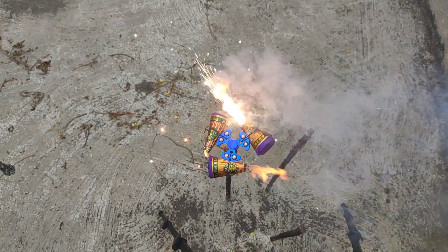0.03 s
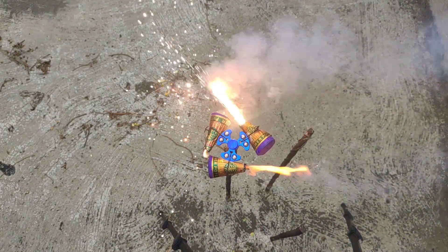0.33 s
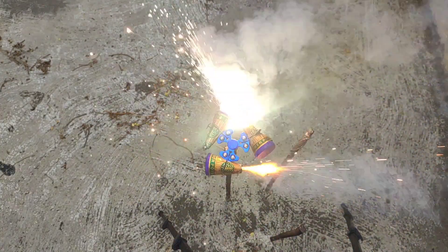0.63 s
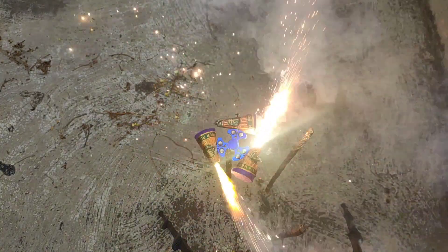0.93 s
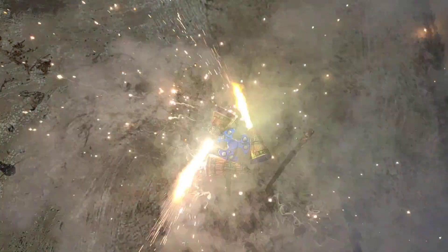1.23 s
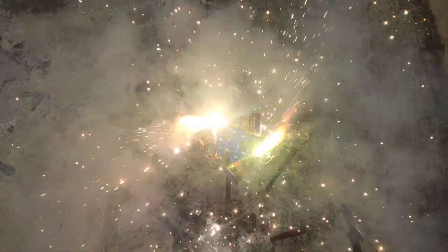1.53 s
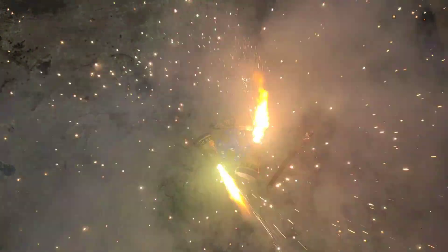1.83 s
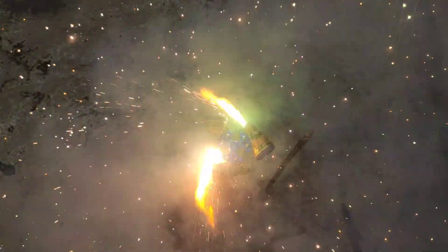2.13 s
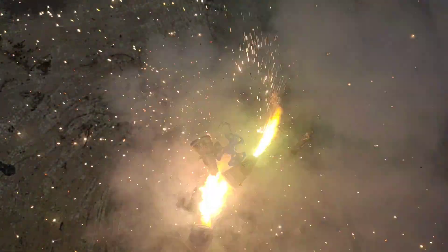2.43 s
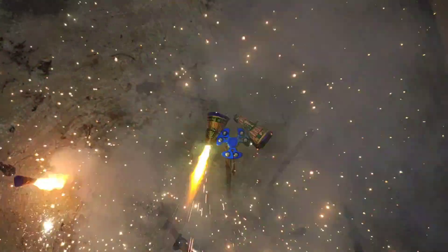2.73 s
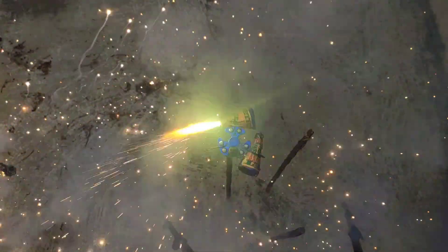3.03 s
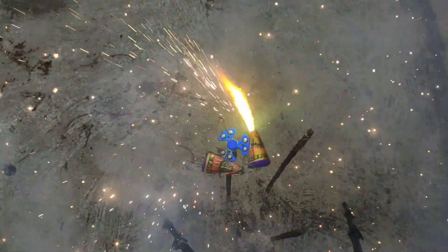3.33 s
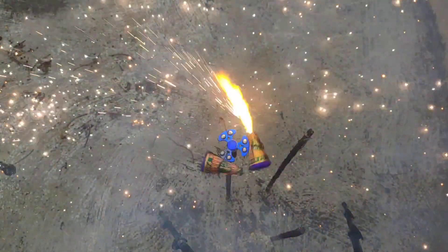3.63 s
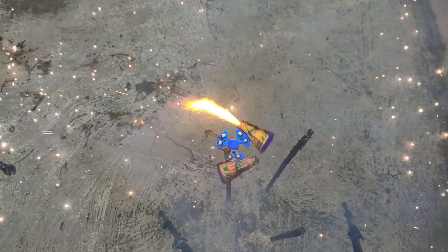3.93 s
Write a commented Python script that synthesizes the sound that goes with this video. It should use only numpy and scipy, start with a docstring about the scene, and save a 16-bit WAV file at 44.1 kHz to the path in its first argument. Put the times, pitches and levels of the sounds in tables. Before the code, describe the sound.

A spinning firework fizzes softly with a few small snaps, then catches and builds into a loud, crackling roar and hiss. It swirls between left and right close by outdoors, while air rumbles on the microphone.

```python
"""Firework wheel on concrete

Small cones on a spinner fizz and snap, then catch and drive it round. Two jets of turbulent gas roar
and spit sparks, the second taking over from the first, and their hiss swirls from ear to ear as they
circle under the microphones. Hard surfaces close by answer, air buffets the mics, and peaks overload."""
import sys
import numpy as np
from scipy import signal
from scipy.fft import rfft, irfft, next_fast_len
from scipy.io import wavfile
from scipy.ndimage import map_coordinates

SR = 44100
rng = np.random.default_rng(int(sys.argv[2]) if len(sys.argv) > 2 else 0)


def waveform_to_disk(signal):
    """Save audio, clipped to [-1, 1], as 16-bit WAV at the path in sys.argv[1]."""
    frames = np.transpose(np.atleast_2d(signal))
    scaled = np.clip(frames, -1, 1) * 32767
    samples = np.round(scaled).astype(np.int16)
    wavfile.write(sys.argv[1], SR, samples)


N = 176400

# the wheel rests, then spins up (time [s], angle [turns])
WHEEL_ANGLE = [(0, -.5), (.85, -.5), (1.02, -.27), (1.178, 0), (1.4, .5), (1.525, 1), (1.708, 2),
               (1.837, 3), (2.038, 5), (2.203, 7), (2.478, 11), (2.647, 13.3), (2.83, 15.3), (3.209, 19.3),
               (3.592, 23.3), (4, 27.22)]
# the first cone burns down and the second takes over (time [s], second cone's share of the power [0-1])
SECOND_CONE_SHARE = [(.9, .02), (1.8, 0.25), (2.3, 0.52), (2.5, 0.62), (2.7, 0.92), (2.95, 0.86)]
# the second cone's thinner voice (frequency [Hz], gain against the first [dB])
SECOND_CONE_EQ = [(200, -2.5), (350, 0), (600, -0.5), (1100, 0.3), (1900, 0), (2900, 2), (4500, 0),
                  (8000, -1), (15000, 1.5)]
# how far a circling jet swings the delay between the mics (time [s], swing either way [ms])
DELAY_SWING = [(0, .018), (.85, .028), (1.18, .055), (2.3, .056), (2.85, .05), (3.1, .04), (4, .035)]
# envelopes of a jet's low roar, mid rush and high hiss (time [s], relative level [dB])
ROAR_ENVELOPE = [(.62, -40), (.71, -30.5), (.95, -31), (1.2, -27.5), (1.45, -22.7), (1.62, -23.3),
                 (1.85, -21.7), (2.15, -22), (2.45, -22.7), (2.73, -21.5), (2.82, -24.5), (2.89, -23),
                 (2.96, -25), (3.65, -24.3), (3.9, -25), (4, -28)]
RUSH_ENVELOPE = [(0.62, -47), (0.72, -30.5), (0.94, -27.5), (0.95, -30.5), (1.15, -22.5), (1.17, -25),
                 (1.47, -16.5), (2.19, -13.5), (2.43, -16.5), (2.5, -17.5), (2.52, -15), (3.1, -14),
                 (3.17, -16.5), (3.22, -14.5), (3.98, -15.5), (4.0, -20)]
HISS_ENVELOPE = [(0.62, -58), (0.72, -32), (0.94, -25), (0.95, -38), (1.0, -26.5), (1.35, -18),
                 (1.42, -14.5), (1.65, -15), (1.74, -15), (1.78, -12.5), (1.84, -13), (1.91, -9),
                 (1.96, -13), (2.06, -9), (3.67, -9), (3.71, -9.5), (3.75, -9), (3.8, -9.5), (3.86, -10.5),
                 (3.9, -12.5), (3.97, -12.5), (4.0, -11.5)]
# tone of the same three layers (frequency [Hz], relative level [dB])
ROAR_TONE = [(60, -32), (130, -9), (220, -2.5), (300, -4), (420, -2.5), (600, -1), (820, -1), (1100, -6.5),
             (2000, -39)]
RUSH_TONE = [(400, -20.5), (780, -9.5), (1000, -1.5), (1400, -0.5), (1750, 0), (2000, 1), (2600, -1),
             (3300, -3), (4200, -8.5), (8000, -17)]
HISS_TONE = [(1500, -26), (2900, -9), (3900, -3), (5200, -0.5), (7000, 0.5), (9000, -1), (11000, -3),
             (13000, -7), (15500, -9.5)]
# a moving high shelf on the hiss (time [s], gain [dB])
HISS_SHELF = [(.68, -9), (.73, 2), (.78, -18), (1.06, -16), (1.12, -3.5), (1.2, -2), (1.3, -4),
              (1.42, -5.5), (1.52, 2), (1.7, 0), (2.2, -3), (3.2, 1.5), (4, -0.2)]

# envelope of the soft flames (time [s], relative level [dB])
FIZZ_ENVELOPE = [(0, -40.5), (.1, -41.5), (.2, -44.5), (.24, -38.5), (.3, -38.5), (.35, -34.5), (.42, -40),
                 (.5, -36.5), (.54, -40.5), (.575, -35), (.62, -36.5), (.66, -35)]
# grains of powder snapping in the flames (time [s], level [dB])
POWDER_SNAPS = [(0.154, -36), (0.2723, -33), (0.36, -21), (.5487, -29)]
# tone of the fizz and of the snaps (frequency [Hz], relative level [dB])
FIZZ_TONE = [(60, 11), (200, -4), (550, -1.5), (1100, -7), (2000, -11.5), (3500, -17), (6500, -13.5),
             (10000, -17), (15500, -24)]
SNAP_TONE = [(100, -3), (500, -3), (2000, -8), (8000, -12), (15500, -12)]

# envelope of the air rumbling on the mics (time [s], relative level [dB])
RUMBLE_ENVELOPE = [(0, -23), (.22, -29.5), (.3, -29.5), (.5, -33), (.62, -43), (.85, -33), (1.05, -30.5),
                   (1.45, -29.5), (1.75, -34), (2, -31.5), (2.4, -30), (2.8, -29.5), (3, -42), (3.5, -39),
                   (4, -46)]
# low thumps as smoke blows past (time [s], relative level [dB])
SMOKE_THUMPS = [(.15, -24), (1.27, -26), (1.44, -23), (1.53, -25), (1.67, -26), (1.88, -18), (2.895, -18)]
# tone of the rumble and of the thumps (frequency [Hz], relative level [dB])
RUMBLE_TONE = [(10, -8.5), (25, -0.5), (42, -2.5), (70, -6), (110, -13), (170, -23), (400, -37),
               (1000, -80)]
THUMP_TONE = [(15, 4), (45, 2), (110, -9), (250, -14.5), (500, -33), (1500, -60)]
# the air hits the right mic harder (time [s], left minus right [dB])
AIR_BALANCE = [(0, -7), (.6, -5.5), (1.2, -5), (1.9, -3), (2.6, -6), (4, -5)]

# direct against scattered sound (frequency [Hz], direct share of the power [0-1])
DIRECT_SHARE = [(100, 0.97), (500, 0.93), (1100, 0.82), (2300, 0.97), (3700, 0.73), (5000, 0.73),
                (8000, 0.58), (11000, 0.7), (15000, 0.23)]
# reflections off hard surfaces close by (delay [ms], low-frequency gain [ratio])
EARLY_ECHOES = [(3.56, 0.26), (5.17, 0.14), (8.6, 0.024)]
# each mic has its own colour (frequency [Hz], left minus right [dB])
MIC_BALANCE = [(200, 0.8), (1000, 0.2), (2500, 1.1), (3400, 1.8), (4100, 1), (5500, 0), (7100, 2),
               (8300, 2), (9400, 1), (11000, 0.5), (12500, -1.9), (15000, -1.2)]

ROAR_TRIM_DB, RUSH_TRIM_DB, HISS_TRIM_DB, FIZZ_TRIM_DB, RUMBLE_TRIM_DB = 0.16, 1, 3.5, 3, 3


def wheel(ignite_s=0.642, fade_in_s=0.05, trail_turns=0.29):
    """Two jets catch and circle, one trailing the other, in an equal-power crossfade."""
    turns, share = curve(WHEEL_ANGLE), curve(SECOND_CONE_SHARE)
    lit = np.clip((seconds() - ignite_s) / fade_in_s, 0, 1)
    first = jet(turns)
    second = filtered(jet(turns - trail_turns), lambda hz: amp(along(SECOND_CONE_EQ, hz)))
    return lit * (np.sqrt(1 - share) * first + np.sqrt(share) * second)


def jet(turns, flutter_db=0.5, sputter_db=1.3, centre_lag_ms=0.03):
    """One cone burns unsteadily: roar, rush and hiss, swept across the stereo image as it circles."""
    roar = amp(curve(ROAR_ENVELOPE) + ROAR_TRIM_DB + 0.88 * wobble(29.94)) * coloured(gas(), ROAR_TONE)
    rush = amp(curve(RUSH_ENVELOPE) + RUSH_TRIM_DB) * coloured(gas(), RUSH_TONE)
    hiss = nozzle_hiss(turns)
    burn = amp(flutter_db * wobble(18) + sputter_db * wobble(130))
    lag_ms = centre_lag_ms + curve(DELAY_SWING) * np.cos(2 * np.pi * turns)
    return at_mics(burn * (roar + rush + hiss), lag_ms)


def nozzle_hiss(turns, shelf_hz=6800, beam_db=0.5, beam_top_db=1.5, aim_turns=0.22):
    """Hiss beams along the nozzle, so it is louder and brighter each time it faces the mics."""
    facing = np.cos(2 * np.pi * (turns + aim_turns))
    hiss = coloured(gas(), HISS_TONE)
    top = filtered(hiss, lambda hz: 1 - 1 / (1 + (hz / shelf_hz) ** 4))
    top_gain = amp(curve(HISS_SHELF) + beam_top_db * facing)
    level_db = curve(HISS_ENVELOPE) + HISS_TRIM_DB + beam_db * facing + 0.5 * wobble(21.8)
    return (hiss + (top_gain - 1) * top) * amp(level_db - choke())


def choke(start_s=0.88, depth_db=4, recovery_s=0.025):
    """The jet chokes for a moment: a sudden dip in the hiss, in dB, that quickly recovers."""
    age = seconds() - start_s
    return depth_db * (age >= 0) * np.exp(-np.abs(age) / recovery_s)


def gas(sparks_per_s=2500, spread_db=2.5, crackle_db=-4.5):
    """Turbulence with sparks crackling in it; rows: direct, scattered left, scattered right."""
    shape = (3, N)
    clicks = (rng.random(shape) < sparks_per_s / SR) * rng.choice([-1, 1], shape)
    sparks = clicks * amp(spread_db * np.clip(rng.standard_normal(shape), -3, 3))
    return unit(rng.standard_normal(shape) + amp(crackle_db) * unit(sparks))


def flames(snap_t60_s=0.0071, flare_s=0.366, flare_db=-38, flare_width_s=0.011):
    """The cones fizz softly throughout; before the jets catch, powder grains snap and one flares."""
    t = seconds()
    fizz = amp(curve(FIZZ_ENVELOPE) + FIZZ_TRIM_DB + wobble(28.85)) * coloured(gas(), FIZZ_TONE)
    snaps = sum((t >= s) * amp(db - 60 * np.abs(t - s) / snap_t60_s) for s, db in POWDER_SNAPS)
    flare = amp(flare_db) * np.exp(-np.abs(t - flare_s) / flare_width_s)
    pops = (snaps + flare) * coloured(gas(), SNAP_TONE)
    return at_mics(fizz + pops, lag_ms=0.019)


def buffeting(gust_db=3.4, thump_width_s=0.022):
    """Moving air rumbles on each mic separately, and passing smoke adds a few soft thumps."""
    gusts = amp(gust_db * np.array([wobble(12), wobble(20)]))
    rumble = unit(gusts * coloured(rng.standard_normal((2, N)), RUMBLE_TONE))
    rumble *= amp(curve(RUMBLE_ENVELOPE) + RUMBLE_TRIM_DB)
    swells = sum(amp(db) * np.exp(-((seconds() - s) / thump_width_s) ** 2) for s, db in SMOKE_THUMPS)
    thumps = swells * coloured(rng.standard_normal((2, N)), THUMP_TONE)
    return (rumble + thumps) * pan(curve(AIR_BALANCE))


def surroundings(x, echo_lowpass_hz=2880, tail_db=-14.5, tail_t60_s=0.03, tail_highpass_hz=660):
    """Hard surfaces answer: short, dull echoes hollow the roar, and a dense tail ripples the hiss."""
    def comb(hz):
        echoes = sum(gain * np.exp(-2j * np.pi * hz * ms / 1000) for ms, gain in EARLY_ECHOES)
        return 1 + echoes / (1 + (hz / echo_lowpass_hz) ** 2)

    t = seconds()[:SR // 10]
    tail = rng.standard_normal((2, len(t))) * amp(-60 * t / tail_t60_s) * (1 - np.exp(-t / 0.002))
    scatter = signal.fftconvolve(x, tail / np.linalg.norm(tail[0]), axes=1)[:, :N]
    scatter = filtered(scatter, lambda hz: hz / np.hypot(hz, tail_highpass_hz))
    return filtered(x, comb) + amp(tail_db) * scatter


def at_mics(sound, lag_ms):
    """Direct sound reaches the left mic lag_ms after the right; each gets its own scattered sound."""
    direct = filtered(sound[0], lambda hz: np.sqrt(along(DIRECT_SHARE, hz)))
    scattered = filtered(sound[1:], lambda hz: np.sqrt(1 - along(DIRECT_SHARE, hz)))
    half_lag = lag_ms * SR / 2000  # samples
    pair = [map_coordinates(direct, [np.arange(N) + side * half_lag], order=5, mode="mirror")
            for side in (-1, 1)]
    return np.array(pair) + scattered


def amp(db):
    """Decibels to gain."""
    return 10 ** (np.asarray(db) / 20)


def pan(balance_db):
    """Left and right gains that lie balance_db apart."""
    return amp(balance_db * np.array([[0.5], [-0.5]]))


def unit(x):
    """x scaled to rms 1."""
    return x / np.sqrt(np.mean(x ** 2) + 1e-20)


def along(points, hz):
    """An EQ curve: (frequency, value) points joined on a log axis."""
    knots_hz, values = np.transpose(points)
    return np.interp(np.log(hz + 1), np.log(knots_hz + 1), values)


def seconds():
    """The time of each sample."""
    return np.arange(N) / SR


def curve(points):
    """An envelope: (time, value) points joined by straight lines."""
    return np.interp(seconds(), *np.transpose(points))


def wobble(rate):
    """Smooth random modulation, rate knots a second."""
    return map_coordinates(rng.standard_normal(1024), [seconds() * rate], mode="mirror")


def filtered(x, response):
    """x through a frequency response."""
    size = next_fast_len(N + 8192)
    return irfft(rfft(x, size) * response(np.fft.rfftfreq(size, 1 / SR)), size)[..., :N]


def coloured(x, tone):
    """x shaped by a tone table, at rms 1."""
    return unit(filtered(x, lambda hz: amp(along(tone, hz))))


def scene():
    """The firework in its surroundings, and the air on the mics."""
    return surroundings(flames() + wheel()) + buffeting()


def record(dry):
    """Each mic colours its side, peaks flatten at full scale, and a steep low-pass trims the top."""
    heard = filtered(dry, lambda hz: pan(along(MIC_BALANCE, hz)))
    return filtered(np.clip(heard, -1, 1), lambda hz: hz < 15530)


dry = scene()
out = record(dry)
waveform_to_disk(out)
```